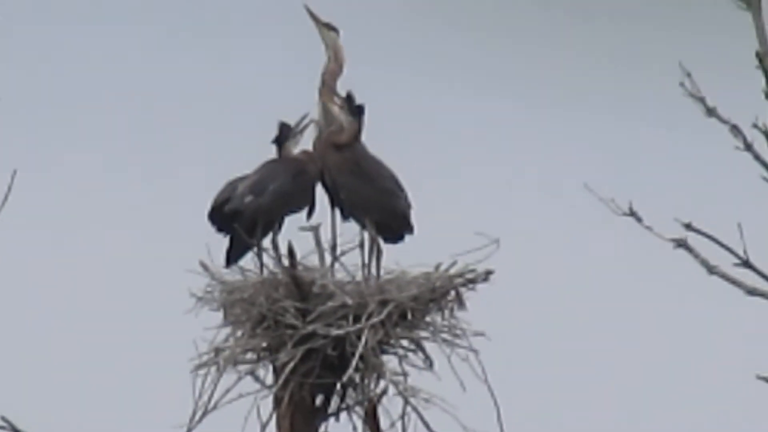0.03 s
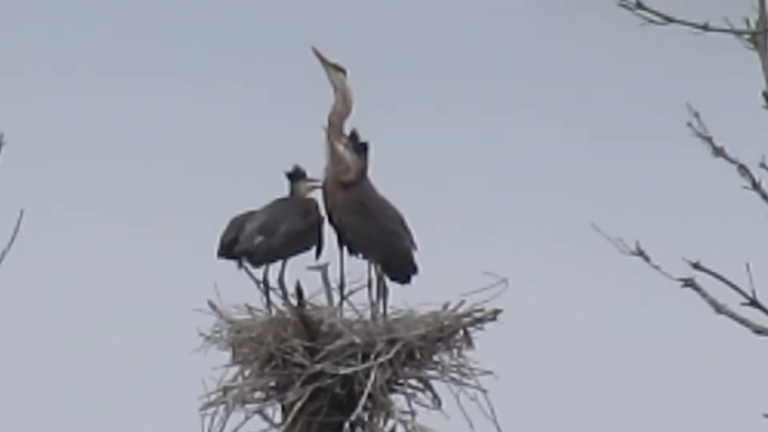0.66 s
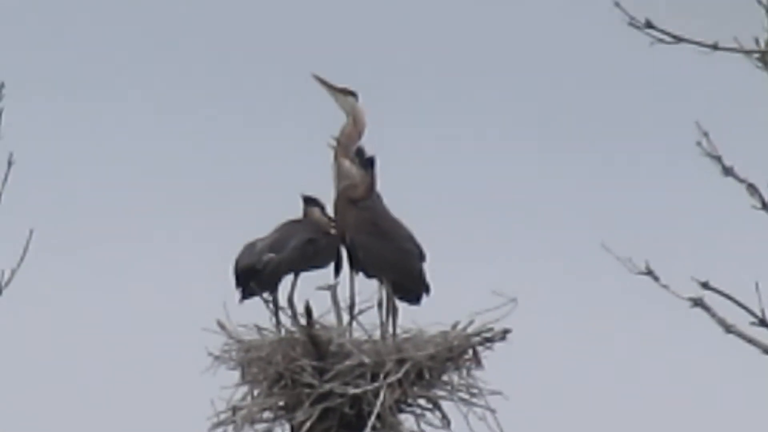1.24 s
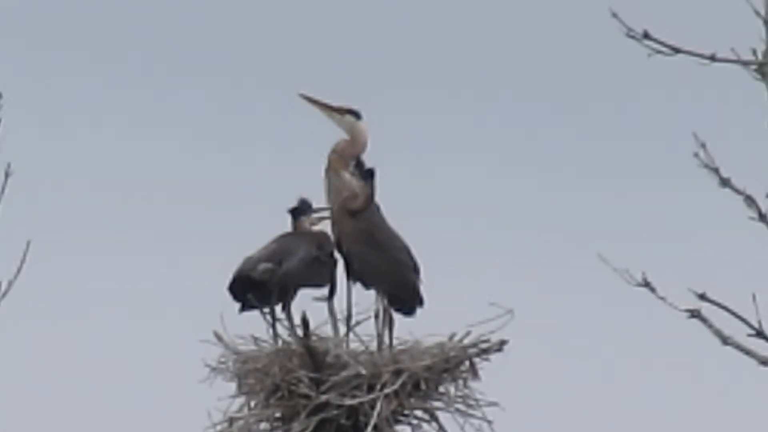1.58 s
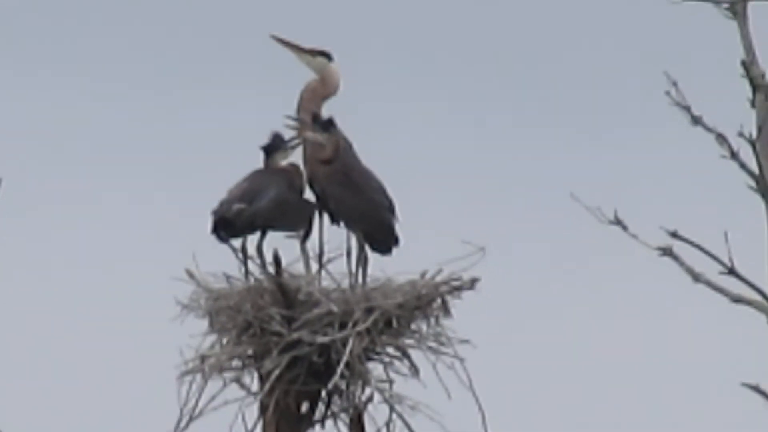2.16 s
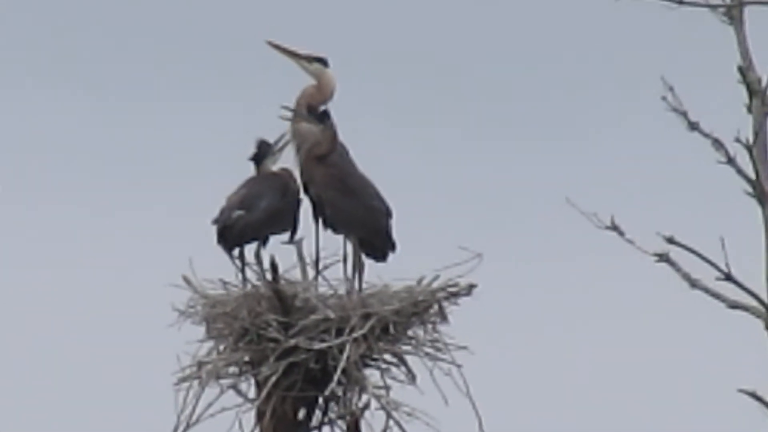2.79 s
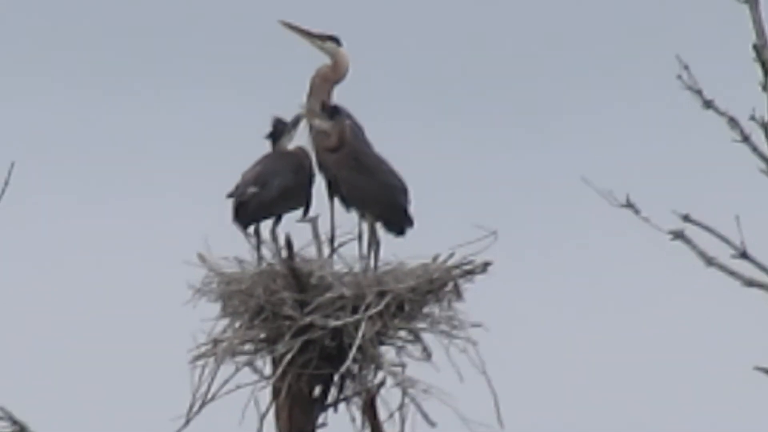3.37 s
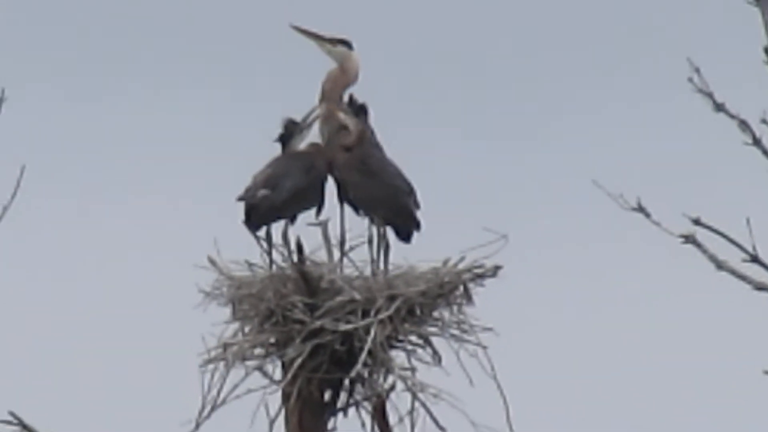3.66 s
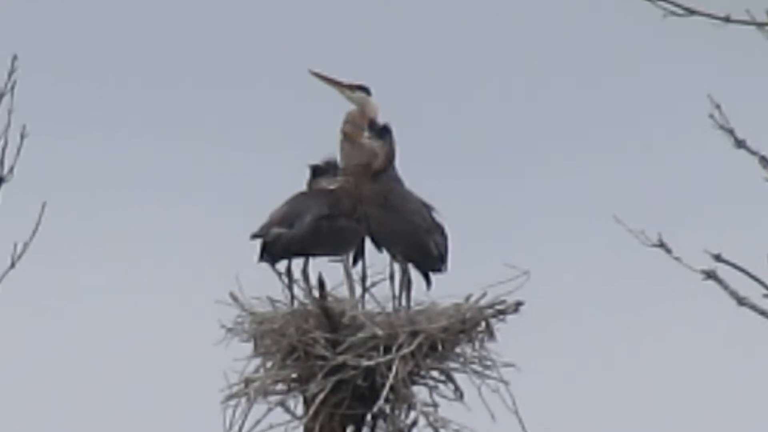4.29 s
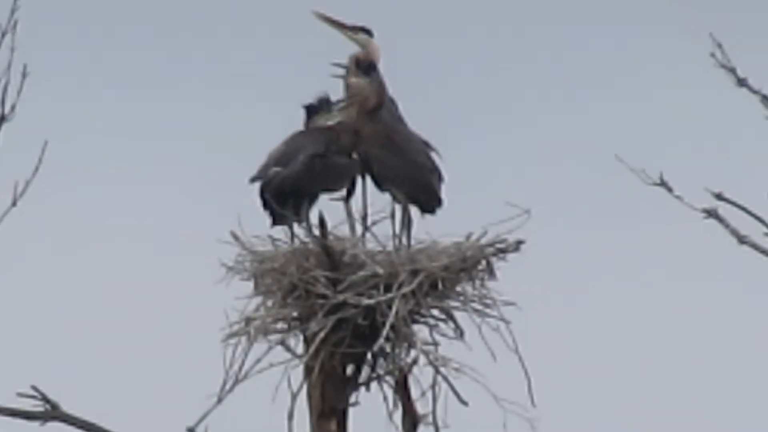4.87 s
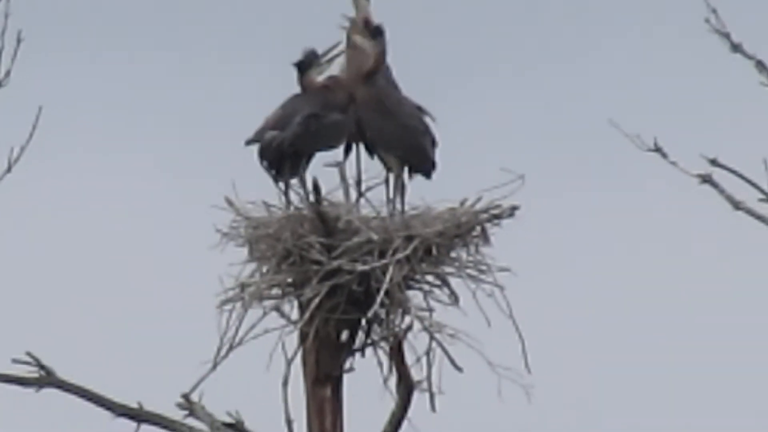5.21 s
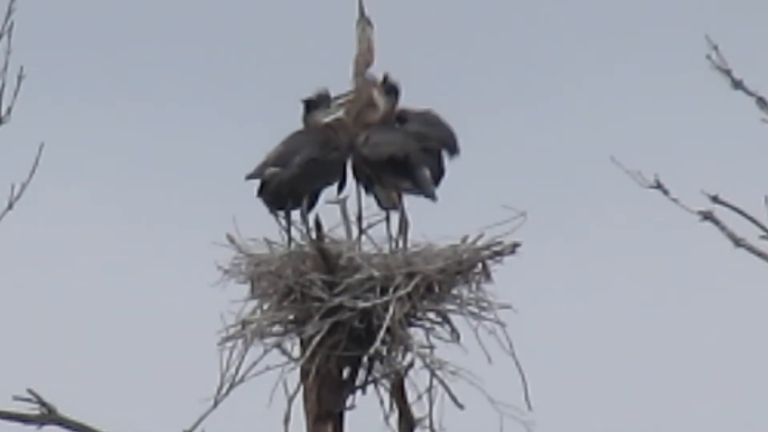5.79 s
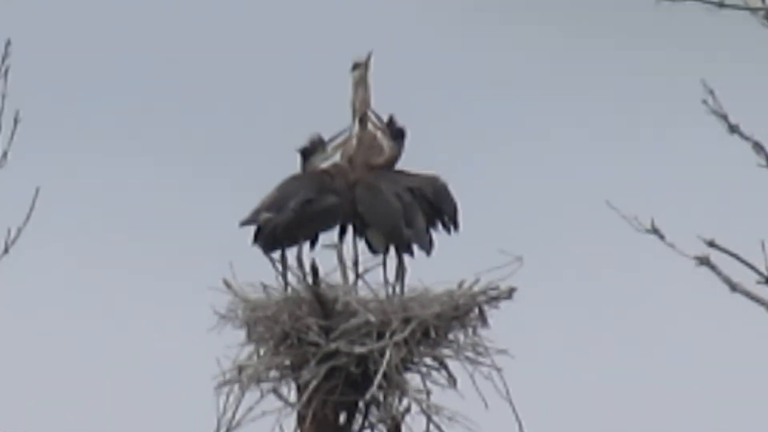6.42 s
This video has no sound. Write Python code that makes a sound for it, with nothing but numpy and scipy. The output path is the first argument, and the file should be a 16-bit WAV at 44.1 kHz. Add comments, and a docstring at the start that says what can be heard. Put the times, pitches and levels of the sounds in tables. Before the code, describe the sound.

Outdoors among trees, a continuous high cricket trill sits near on the left, over a soft hush and a faint pulsing insect buzz. Young herons clack hoarsely in the distance, sparse at first, then busier and stronger. A nearer small bird gives sharp chips near the start and again in the middle, while others add thin whistles and faint warbles. Wind occasionally bumps the microphone with a low rumble.

```python
"""A cricket trills close by on the left, scraping its wings together, with a second one further off.
Young herons beg for food from a distant nest, each clack a short rasp through the throat and beak.
Small birds chip, whistle, warble and pip among echoing trees, and a third insect buzzes in short bursts.
Light gusts rumble on the microphone over the steady hush of the open air."""
import sys
import numpy as np
from scipy import signal
from scipy.fft import rfft, irfft
from scipy.io import wavfile

SR = 44100
rng = np.random.default_rng(int(sys.argv[2]) if len(sys.argv) > 2 else 0)


def transcribe(u):
    """Save the signal u as a 16-bit wav file named by the first command-line argument.

    u: samples, shape (n,) or (channels, n), limited to [-1, 1]; the rate is SR.
    q: integer samples, one column per channel.
    """
    v = np.clip(np.atleast_2d(u).T, -1, 1)
    q = np.round(v * 32767).astype(np.int16)
    wavfile.write(sys.argv[1], SR, q)


N = 284445
TIME = np.arange(N) / SR


# how fast the near cricket's wings move: (time [s], pace [strokes per s])
WING_PACE = [(0, 68.5), (.38, 69.5), (.52, 85), (1.1, 85), (1.65, 81.7), (2.2, 83), (3.7, 82.7),
             (4.4, 83.2), (4.6, 79), (4.75, 68.3), (5.2, 70), (5.35, 85), (6.2, 85), (6.45, 82)]
# how both trills swell and fade: (time [s], relative level [dB])
TRILL_LEVEL = [(0, -44), (.35, -46), (.6, -44), (1, -42), (2, -42), (3, -42.5), (4.1, -41), (4.55, -42.5),
               (4.8, -45), (5.25, -46), (5.6, -44), (6, -41), (6.45, -42.5)]
def crickets():
    """Two crickets scrape their wings: the near one drops in pitch as it slows, the far one is faster."""
    pace, level_db = follow(WING_PACE), follow(TRILL_LEVEL)
    pitch_hz = 5910 + 5 * (pace - 83)  # 83 strokes a second is its usual pace
    near = wing_strokes(pace, pitch_hz, sag_hz=1080, jitter=.028, flutter_db=1.7,
                        scatter_hz=40, scrape=.12, overtone_db=-32)
    near += gain_of(-14) * np.roll(near, round(.00922 * SR))  # one quick echo off a trunk
    near = placed(near * gain_of(level_db - 9.7), pan_db=16, phase=2.02)
    far = wing_strokes(93.7 + .5 * drift(1), hz=6000, sag_hz=800, jitter=.025, flutter_db=1.5,
                       scatter_hz=45, scrape=.2, overtone_db=-28)
    far = placed(far * gain_of(level_db - 17), pan_db=18.5, phase=1.5)
    return tree_echoes(near, fade_s=.095, echo_db=-9) + tree_echoes(far, fade_s=.29, echo_db=-5)


def wing_strokes(pace, hz, sag_hz, jitter, flutter_db, scatter_hz, scrape, overtone_db, spread=1):
    """Each closing of the wings scrapes out one pulse, whose pitch sags as the wings slow."""
    turns = np.cumsum(pace) / SR + jitter * drift(50)
    turns -= turns.min()
    stroke, place = turns.astype(int), turns % 1 - .5  # place is 0 in the middle of a stroke
    louder, higher = rng.standard_normal((stroke.max() + 1, 2))[stroke].T
    width = spread * np.where(place < 0, .175, .29)  # a pulse rises faster than it falls
    swell = np.exp(-(place / width) ** 2) * np.sqrt(np.cos(np.pi * place).clip(0))
    swell *= np.exp(scrape * drift(820))  # the wing's tiny teeth catch unevenly
    pitch_hz = hz - sag_hz * place * (1 + place) + scatter_hz * higher
    return evened(swell * gain_of(flutter_db * louder) * tone(pitch_hz, overtone_db))


# runs of begging, which overlap when both chicks call: (first time [s], last time [s], clacks [count],
# first and last relative level [dB], first and last beak pitch [Hz], brightness [dB])
BEGGING_RUNS = [(0.096, 0.628, 4, -56, -52, 1500, 1550, -21), (.888, 1.263, 3, -48, -46, 1700, 1740, -20),
                (1.433, 1.6, 2, -51, -53, 1860, 1750, -22), (2.094, 2.647, 4, -49, -49, 1920, 1860, -14),
                (2.756, 3.93, 8, -43.5, -43, 1900, 1960, -12),
                (3.862, 4.223, 3, -48, -44.5, 1580, 1740, -14), (4.436, 4.921, 4, -41, -40, 2100, 1990, -9),
                (4.648, 4.824, 2, -47, -44, 1600, 1830, -18), (5.024, 5.087, 2, -42.5, -45, 1650, 1600, -5),
                (5.209, 5.387, 2, -45, -46, 1460, 1460, -17),
                (5.245, 5.419, 2, -39.5, -39.5, 1750, 1550, 2),
                (5.574, 5.793, 2, -45, -46.5, 1470, 1450, -16),
                (5.94, 6.418, 4, -43.5, -40.5, 1827, 1650, -9.5)]
# how much of each frequency a chick's throat lets through: (frequency [Hz], level [dB])
HERON_THROAT = [(500, -25), (900, -14), (1200, -8.5), (1500, -4), (1750, -5), (2050, -6), (2450, -10),
                (2900, -9), (3500, -17.5), (4100, -20), (6000, -50), (12000, -70)]
def young_herons():
    """Each clack is a short rasp: ragged flaps of a membrane and puffs of air through the throat."""
    clacks = np.concatenate([np.linspace((first, db0, hz0, bright), (last, db1, hz1, bright), count)
                             for first, last, count, db0, db1, hz0, hz1, bright in BEGGING_RUNS])
    chance = rng.standard_normal((len(clacks), 2))
    out, t = np.zeros(N), np.arange(SR // 7) / SR
    rise = t / .022  # a clack peaks after 22 ms
    swell = rise ** 2 * np.exp(2 * (1 - rise))
    for (start, db, hz, bright_db), (louder, higher) in zip(clacks, chance):
        hz *= 1 + .033 * higher
        turns = np.cumsum(370 * np.exp(.25 * drift(150, len(t)))) / SR  # about 370 flaps a second
        flaps = np.diff(np.floor(turns), prepend=0)
        puffs = np.exp(-(turns % 1) / .51) * rng.standard_normal(len(t))
        voice = (evened(flaps) + 1.47 * evened(puffs)) * np.exp(.047 * drift(260, len(t)))
        beak = [(hz / 2, -3), (hz / 1.32, -4), (hz, 4), (hz * 1.33, -4),
                (3000, bright_db + 5), (5000, -3)]
        rasp = coloured(coloured(voice, HERON_THROAT), beak)
        add(out, start, gain_of(db + louder - 7) * evened(rasp) * swell)
    return tree_echoes(placed(out, pan_db=-.5, phase=-.17), fade_s=.81, echo_db=-5)


# a near bird's sharp chips: (time [s], length [s], start pitch [Hz], top pitch [Hz], end pitch [Hz],
# waver [share of the pitch], relative level [dB])
SHARP_CHIPS = [(.627, 0.024, 4060, 7290, 6300, .012, -30), (.696, 0.021, 4130, 6760, 5550, .015, -31.5),
               (0.779, 0.035, 3970, 4570, 4600, 0.039, -35), (3.41, .037, 3900, 7680, 3900, .02, -25.5),
               (3.49, .037, 3700, 7400, 3700, .015, -24.5), (3.594, 0.039, 4164, 5880, 2900, 0.1, -28.5),
               (3.747, 0.035, 4300, 5425, 2800, 0.056, -27)]
def chipping_bird():
    """Both sides of the bird's voice box sing fast arches of pitch, wrapped in a scratchy hiss."""
    out = np.zeros(N)
    hiss_colour = [(1200, -2), (2800, -2), (5000, 2), (7200, 13), (9500, -17.5), (13500, -10),
                   (16000, -15)]
    for start, length, start_hz, top_hz, end_hz, waver, db in SHARP_CHIPS:
        climbing_hz = top_hz - .2 * (top_hz - start_hz)
        falling_hz = top_hz - .0826 * (top_hz - end_hz)
        arch = np.array([start_hz, climbing_hz, falling_hz, end_hz])
        low = bird_note(length, arch * .62, waver=.067, taper=.12, overtone_db=-23)
        main = bird_note(length, arch, waver, taper=.35, overtone_db=-21)
        high = bird_note(length, arch * 1.16, waver=.027, taper=.28, overtone_db=-13)
        flicker = np.exp(.093 * drift(400, len(main)))
        add(out, start, gain_of(db - 23) * low)
        add(out, start, gain_of(db - 9) * (main + gain_of(-14.5) * high) * flicker)
        size = int((length + .028) * SR)
        hiss = evened(coloured(rng.standard_normal(size), hiss_colour))
        add(out, start - .016, gain_of(db - 20.5) * hiss * signal.windows.tukey(size, .5))
    among_twigs = tree_echoes(placed(out, pan_db=-4.5, phase=-2.18), fade_s=.083, echo_db=-13)
    return tree_echoes(among_twigs, fade_s=.46, echo_db=-6.5)


# runs of buzzing: (first time [s], last time [s], bursts [count], first and last relative level [dB])
INSECT_BURSTS = [(.04, 1.822, 6, -54.5, -51), (2.212, 3.622, 5, -51, -49), (4.045, 4.925, 4, -51, -50.5),
                 (5.29, 6.325, 4, -51, -48)]
def buzzing_insect():
    """A higher insect works its wings for about eight strokes at a time, some three times a second."""
    bursts = np.zeros(N)
    burst = signal.windows.tukey(int(.098 * SR), .25)
    for first, last, count, first_db, last_db in INSECT_BURSTS:
        for start, db in np.linspace((first, first_db), (last, last_db), count):
            add(bursts, start, gain_of(db - 7.5) * burst)
    buzz = wing_strokes(np.full(N, 80.), hz=7840, sag_hz=220, jitter=.04, flutter_db=1.5,
                        scatter_hz=40, scrape=.15, overtone_db=-50, spread=1.3)
    return tree_echoes(placed(buzz * bursts, pan_db=2, phase=1.84), fade_s=.05, echo_db=.5)


# whistles that hold and then fall: (time [s], top pitch [Hz], relative level [dB])
FALLING_WHISTLES = [(1.753, 7800, -51.5), (3.015, 8200, -45.5), (5.275, 7740, -48.5), (5.625, 8160, -44.5)]
# nearly flat whistles: (time [s], length [s], pitch [Hz], relative level [dB], left over right [dB])
FLAT_WHISTLES = [(.96, 0.076, 4600, -51.5, 7), (1.245, 0.032, 7170, -47, -14.5),
                 (4.785, 0.075, 6860, -47.5, 11), (5.109, 0.086, 6940, -48, 10.5),
                 (5.713, 0.1, 9090, -47.5, 2.5)]
# the slight bend of a flat whistle, from start to end: (pitch [share of the whistle's pitch])
WHISTLE_BEND = (.975, 1, 1.002, .99)
def whistling_birds():
    """Small birds whistle thin, high tones, some flat and some falling at the end."""
    out = np.zeros((2, N))
    fall = np.array([.99, 1, .965, .83])
    calls = [(start, .128, fall * hz, db, 7) for start, hz, db in FALLING_WHISTLES]
    calls += [(start, length, np.multiply(WHISTLE_BEND, hz), db, pan_db)
              for start, length, hz, db, pan_db in FLAT_WHISTLES]
    for start, length, pitches, db, pan_db in calls:
        whistle = bird_note(length, pitches, waver=.0077, taper=.18, overtone_db=-44.5)
        add(out, start, placed(gain_of(db - 1.5) * whistle, pan_db, phase=np.pi))
    return tree_echoes(out, fade_s=.59, echo_db=-9)


# gliding notes: (time [s], length [s], start, middle and end pitch [Hz], relative level [dB])
WARBLED_NOTES = [(2.585, .08, 2560, 2720, 2680, -54.5), (2.78, .07, 2450, 2980, 2850, -54.5),
                 (2.848, .062, 3380, 2850, 2060, -47.5), (3.09, .08, 3050, 3300, 2750, -58),
                 (4.11, .12, 2810, 2570, 2350, -59.5), (4.3, .11, 2550, 2390, 2310, -59)]
def warbling_bird():
    """A songbird's lower glides come from deeper in the trees and echo more."""
    out = np.zeros(N)
    for start, length, *pitches, db in WARBLED_NOTES:
        glide = bird_note(length, pitches, waver=.035, taper=.5, overtone_db=-30)
        add(out, start, gain_of(db - 3.5) * glide)
    return tree_echoes(placed(out, pan_db=5, phase=1.47), fade_s=.7, echo_db=-3)


def pipping_bird():
    """A far-off bird gives five faint pips on one pitch."""
    out = np.zeros(N)
    for start in np.linspace(5.372, 5.794, 5):
        pip = bird_note(length=.024, pitches=(3630, 3630), waver=.0048, taper=.47, overtone_db=-30)
        add(out, start, gain_of(-58.5) * pip)
    return tree_echoes(placed(out, pan_db=6, phase=1.9), fade_s=.3, echo_db=-4)


# buzzy songbird calls, the first ending the chipping bird's song: (time [s], length [s], throat pitch [Hz],
# spread around it [Hz], # pace [pulses per s], relative level [dB], left over right [dB])
BUZZY_CALLS = [(0.844, 0.15, 3560, 615, 310, -52.5, -8), (4.152, .15, 4400, 480, 140, -52.5, 5),
               (4.492, 0.12, 4100, 486, 130, -52, 6.5), (4.738, .06, 4770, 350, 200, -58, 7),
               (5.859, .079, 5170, 380, 180, -56, 10), (5.98, 0.061, 4880, 300, 120, -55, 7)]
def buzzy_birds():
    """Fast pulses make each bird's throat ring; the trees blur the calls on the way. The first call is the
    chipping bird's buzz that follows its chips."""
    out = np.zeros((2, N))
    for start, length, hz, width_hz, pace, db, pan_db in BUZZY_CALLS:
        size = int(length * SR)
        turns = np.cumsum(pace * (1 + .025 * drift(60, size))) / SR
        harmonics = np.arange(1, int(2 * hz / pace))[:, None]
        throat = np.exp(-((harmonics * pace - hz) / width_hz) ** 2)
        pulses = (throat * np.cos(2 * np.pi * harmonics * turns)).sum(0)
        call = gain_of(db - 3) * evened(pulses) * signal.windows.tukey(size, .5)
        add(out, start, placed(call, pan_db, phase=1.1))
    return tree_echoes(out, fade_s=.62, echo_db=-.5)


# puffs of wind: (time [s], length [s], relative level [dB])
WIND_GUSTS = [(0.578, 0.3, -47.5), (0.912, 0.14, -31), (1.104, 0.3, -45), (2.173, 0.51, -39.5),
              (2.758, 0.31, -40), (3.15, 0.59, -63), (3.505, 0.22, -45), (4.553, 0.17, -43),
              (5.002, 0.42, -36), (5.363, 0.14, -46.5), (5.776, .2, -43), (5.974, 0.25, -40)]
# how deep the wind sounds: (frequency [Hz], relative level [dB])
WIND_COLOUR = [(15, -6), (28, -1.5), (45, -1), (80, 2), (120, -4.5), (170, -15.5), (250, -31.5), (400, -44),
               (900, -96)]
def wind():
    """Gusts rise out of a light breeze and push on the microphone, harder on the right."""
    breeze_db, rise_s, fall_s = -47.5, .023, .094
    power = np.full(N, gain_of(breeze_db) ** 2)
    for start, length, db in WIND_GUSTS:
        push = np.minimum((TIME - start) / rise_s, (start + length - TIME) / fall_s).clip(0, 1)
        power += (gain_of(db) * push) ** 2
    strength = np.sqrt(power)
    rumble = noise_pair(WIND_COLOUR, likeness=[(30, -.95), (100, -.86), (300, -.7)])
    small_swirls = coloured(rumble, [(110, -30), (180, -1), (400, 5)])
    rumble += small_swirls * strength / gain_of(-30)  # strong gusts bring more small swirls
    shake = gain_of(2.5 * drift(13.3))  # swirling air shakes the wind's strength
    return rumble * strength * shake * gain_of([[4.3], [9.9]])


# the lows and highs of the hush: (frequency [Hz], relative level [dB])
HUSH_COLOUR = [(30, 5.5), (150, 10), (280, 4), (500, 0), (900, -5), (1700, -9), (2600, -12), (4000, -15),
               (5200, -14), (7000, -15), (9000, -21.5), (12000, -25), (15500, -30)]
# how alike its left and right sides are: (frequency [Hz], likeness [-1 opposite to 1 same])
HUSH_LIKENESS = [(100, -0.42), (500, -0.72), (900, -0.51), (1600, -0.17), (4000, 0.09), (8000, -0.36),
                 (15000, 0.13)]
def open_air():
    """A steady hush of leaves and distance swells very slightly."""
    return noise_pair(HUSH_COLOUR, HUSH_LIKENESS) * gain_of(-46 + .2 * drift(.98))


def tree_echoes(x, fade_s, echo_db):
    """Trunks and leaves send back many weak echoes, which die down by 60 dB in fade_s."""
    t = np.arange(SR // 2) / SR
    echoes = rng.standard_normal((2, len(t))) * (rng.random((2, len(t))) < .1)
    echoes *= gain_of(-60 * t / fade_s) * (t > .002)
    echoes /= np.linalg.norm(echoes, axis=1, keepdims=True)
    return x + gain_of(echo_db) * signal.fftconvolve(x, echoes, axes=1)[:, :N]


def bird_note(length, pitches, waver, taper, overtone_db):
    """A nearly pure bird tone glides smoothly through its pitches, fading in and out."""
    size = int(length * SR)
    curve = np.polyfit(np.linspace(0, 1, len(pitches)), pitches, len(pitches) - 1)
    hz = np.polyval(curve, np.linspace(0, 1, size)) * (1 + waver * drift(410, size))
    return evened(tone(hz, overtone_db)) * signal.windows.tukey(size, taper)


def tone(hz, overtone_db):
    """A tone that follows a changing pitch, with a weaker one an octave above."""
    phase = 2 * np.pi * np.cumsum(hz) / SR
    return np.sin(phase) + gain_of(overtone_db) * np.sin(2 * phase)


def placed(x, pan_db, phase):
    """Sound from one side reaches left and right unequally loud and out of step; pan_db > 0 is left."""
    shifted = (signal.hilbert(x) * np.exp(-1j * phase)).real
    return np.array([x * gain_of(pan_db / 2), shifted * gain_of(-pan_db / 2)])


def noise_pair(colour, likeness):
    """Left and right noise, partly alike or partly opposite."""
    left, other = rfft(rng.standard_normal((2, N)))
    same = np.clip(value_at(likeness, frequencies(TIME)), -1, 1)
    right = same * left + np.sqrt(1 - same ** 2) * other
    return evened(coloured(irfft([left, right], N), colour))


def drift(hz, size=N):
    """A smooth random wobble of strength one, no faster than about hz."""
    noise = rng.standard_normal(size + SR)
    keep_slow = np.exp(-(frequencies(noise) / hz) ** 2)
    return evened(irfft(rfft(noise) * keep_slow, len(noise)))[:size]


def coloured(x, colour):
    """Turns lows and highs up or down by rows of (frequency [Hz], level [dB])."""
    return irfft(rfft(x) * gain_of(value_at(colour, frequencies(x))), x.shape[-1])


def value_at(rows, hz):
    """Looks up a table at any frequency, sliding between rows on a musical (log) scale."""
    row_hz, values = np.transpose(rows)
    return np.interp(np.log(hz + 1), np.log(row_hz + 1), values)


def frequencies(x):
    """The frequencies that make up x, in Hz."""
    return np.fft.rfftfreq(x.shape[-1], 1 / SR)


def follow(rows):
    """Joins rows of (time [s], value) into a line through every sample."""
    return np.interp(TIME, *np.transpose(rows))


def add(mix, start, sound):
    """Mixes a sound in at start seconds."""
    part = mix[..., max(round(start * SR), 0):][..., :sound.shape[-1]]
    part += sound[..., :part.shape[-1]]


def evened(x):
    """Scales a sound to an average strength (rms) of one."""
    return x / np.sqrt(np.mean(x ** 2) + 1e-20)


def gain_of(db):
    """Turns decibels into a number to multiply by."""
    return 10 ** (np.asarray(db) / 20)


def scene():
    """Insects, birds and weather sound together."""
    insects = crickets() + buzzing_insect()
    birds = young_herons() + chipping_bird() + whistling_birds()
    more_birds = warbling_bird() + pipping_bird() + buzzy_birds()
    return insects + birds + more_birds + wind() + open_air()


def record(dry):
    """Cuts away the very highest treble."""
    treble_cut = signal.firwin(511, cutoff=15750, window=("kaiser", 9), fs=SR)
    return signal.oaconvolve(dry, treble_cut[None], "same")


dry = scene()
out = record(dry)
transcribe(out)
```